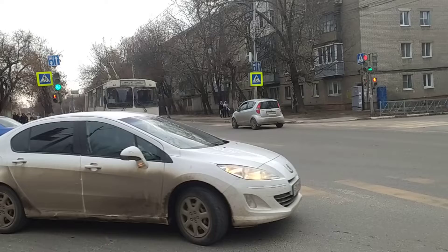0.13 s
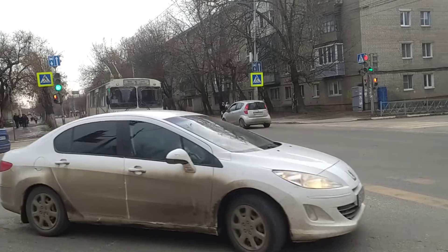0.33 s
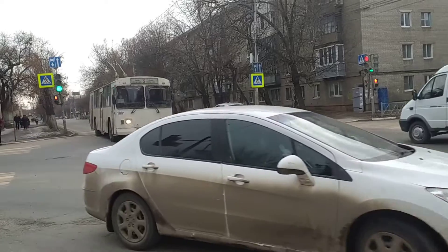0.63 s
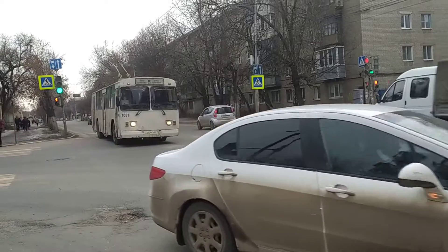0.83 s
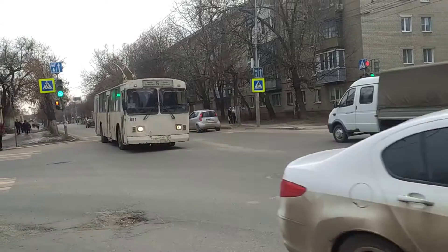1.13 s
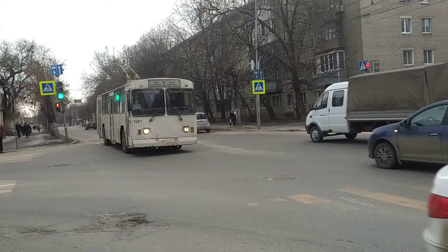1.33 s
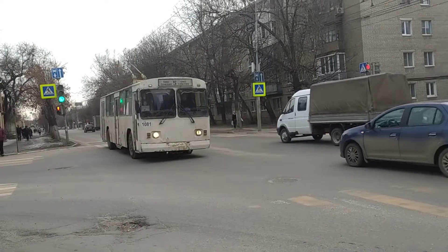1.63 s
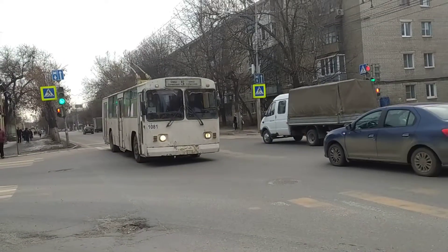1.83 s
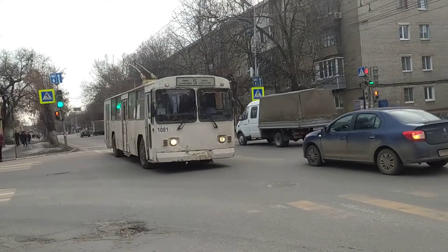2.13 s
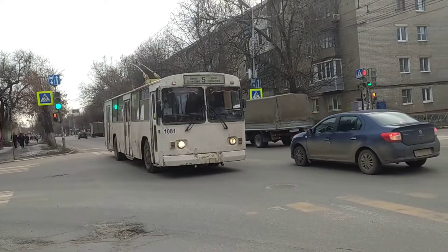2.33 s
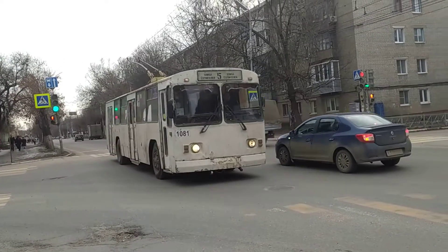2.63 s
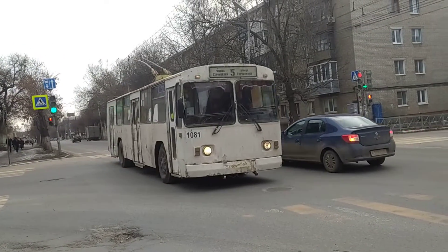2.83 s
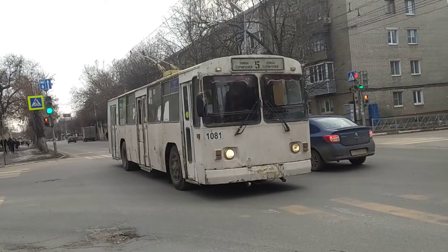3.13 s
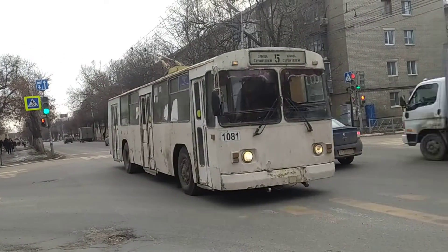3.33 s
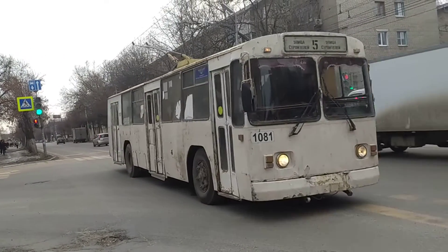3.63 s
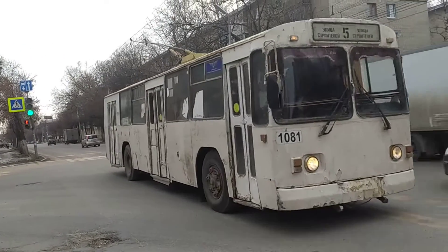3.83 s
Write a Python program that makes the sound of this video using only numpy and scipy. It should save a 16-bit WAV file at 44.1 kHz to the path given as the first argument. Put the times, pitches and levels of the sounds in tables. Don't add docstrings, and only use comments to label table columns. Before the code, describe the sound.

Traffic at a windy city crossing, on a handheld phone. Silence until about 0.4 s, then abruptly tyre roar with gritty clicks from a close car, and a diesel van's rattling knocks, strongest at 0.9-1.8 s. Both recede after 2 s. Tiny, very high brake squeals flutter around 2.1-2.4 s and intermittently from 3.1 s. Wind thumps each side separately, with hard left slaps near 2.2 and 2.8 s, over distant traffic rumble.

```python
import sys
import numpy as np
from scipy import signal
from scipy.fft import rfft, irfft, next_fast_len
from scipy.io import wavfile
from scipy.ndimage import uniform_filter1d, map_coordinates

SR = 44100
rng = np.random.default_rng(int(sys.argv[2]) if len(sys.argv) > 2 else 0)


def voltage_ratio(level):
    return 10 ** (np.asarray(level, float) / 20)


def log_audio(samples):
    frames = np.atleast_2d(samples).T
    limited = np.clip(frames, -1, 1)
    pcm = np.round(limited * 32767).astype(np.int16)
    wavfile.write(sys.argv[1], SR, pcm)


N = 176400

# time in seconds, firing rate in Hz, exhaust hum in dB.
ENGINE = [(.4, 43.8, -34), (.92, 42.9, -33), (1.22, 40, -28.5), (1.6, 43.7, -35.5), (1.85, 45.48, -28),
          (2.25, 48.25, -38.5), (2.6, 53.76, -27), (3.08, 58.2, -32), (3.5, 60.7, -42.5), (4, 61.7, -39)]
# time in seconds, level in dB.
VAN_NEARNESS = [(.4, -34.5), (.68, -30), (.85, -26), (.93, -21.5), (1.02, -26), (1.17, -23.5), (1.36, -35),
                (1.45, -26.5), (1.82, -26.5), (1.96, -30.5), (2.23, -28), (2.4, -33), (3.2, -35.5),
                (4, -45.5)]
# start in seconds, peak in dB, pitch in Hz.
KNOCKS = [(0.8637, 4, 1460), (0.8872, 8.5, 1340), (0.9086, -14, 2220), (0.9495, -12, 2000),
          (1.0453, -3, 1280), (1.0942, 5, 1340), (1.1837, 1, 1980), (1.4025, -9, 2000), (1.5411, -3, 2280),
          (1.631, -3, 2170), (1.7152, -4, 2170), (1.7876, 1.5, 2161), (1.831, -6, 2213)]
# centre in Hz, width in Hz, level in dB.
BLOCK_MODES = [(1204, 320, -1), (2202, 290, 1), (3400, 160, -7.5), (6040, 1500, -18.5)]
# time in seconds, level in dB.
CAR_NEARNESS = [(.4, -32), (.5, -32.5), (.6, -30.5), (.72, -29), (.92, -30), (1.05, -31.5), (1.12, -29.5),
                (1.18, -27.5), (1.27, -29), (1.4, -31), (1.47, -32.5), (1.7, -32.5), (1.85, -34),
                (2.0, -35.5), (2.4, -36.5), (3.3, -37), (3.7, -39), (4, -43)]
# frequency in Hz, density in dB per Hz.
TYRE_SPECTRUM = [(400, -25), (900, 5.5), (1500, -2.5), (3000, -7), (4800, -16), (9000, -8.5), (10500, -22),
                 (15000, -29.5)]
# frequency in Hz, correlation from 0 to 1.
TYRE_ALIKE = [(500, 0.63), (2500, 0.12), (4000, 0.011)]
# start in seconds, peak in dB, decay time in seconds.
GRIT = [(.4846, -28, .004), (0.811, -21, 0.0044), (1.097, -22, 0.0041), (1.116, -18.5, 0.0062),
        (1.286, -20, .004), (1.352, -21, 0.0044), (1.4031, -18.5, 0.0043), (1.422, -20, 0.0035),
        (1.574, -25, .004), (1.762, -23, 0.0044), (2.147, -24, 0.0049), (3.842, -26.5, 0.0048)]
# frequency in Hz, density in dB per Hz.
GRIT_SPECTRUM = [(4000, -30), (6000, -1.5), (8500, 3.5), (10000, -7.5), (14000, -27)]
# middle in seconds, length in seconds, level in dB, pitch in Hz,
# left port lead in radians.
SQUEALS = [(2.135, .03, -42, 13000, 1.3), (2.16, .022, -33, 13010, 1.3), (2.186, .022, -22.5, 12930, 1.3),
           (2.209, .026, -21.5, 12910, 1.3), (2.24, .02, -33, 12900, 1.1),
           (2.262, .024, -21.5, 12920, 1.05), (2.281, .026, -22, 12925, 1.05),
           (2.304, .024, -29, 12940, 1.05), (2.35, .07, -45, 12900, 1.05), (2.21, .08, -40, 12640, .3),
           (2.29, .08, -41, 12600, .3), (2.27, .08, -44, 13250, 2.2), (2.134, .035, -30, 5585, 1.7),
           (2.175, .05, -34, 5620, 1.7), (2.213, .025, -29.5, 5625, 1.7), (2.255, .035, -37, 5670, 1.7),
           (2.15, .11, -48, 11200, 1.9), (2.36, .03, -41, 10880, 1.9), (2.89, .068, -42.5, 10860, 1.9),
           (3.1, .06, -56, 10150, 1.9), (3.1, .02, -19, 12895, -.2), (3.117, .02, -24, 12910, -.2),
           (3.145, .035, -32, 12895, -.4), (3.184, .028, -27, 12905, -.5), (3.235, .07, -32, 12930, -.5),
           (3.13, .04, -48, 13340, 1.5), (3.245, .09, -46, 13350, 1.5), (3.41, .07, -36, 12915, -.3),
           (3.44, .06, -47, 13290, 1.5), (3.55, .042, -25, 12890, .1), (3.545, .06, -42, 13280, 1.5),
           (3.69, .05, -39, 12870, -1.6), (3.745, .06, -36, 12890, -1.6), (3.748, .045, -36, 13225, -1.2),
           (3.85, .04, -41, 12880, -1.6), (3.85, .07, -45, 13190, -1.2), (3.905, .04, -33, 12910, -1.8),
           (3.985, .08, -30, 12850, -1.8), (3.98, .07, -35, 13020, -1.8), (3.97, .06, -38, 13200, -1.2)]
BRAKE_MODES_HZ = [5620, 10150, 10870, 11200, 12620, 12910, 13030, 13260]
# middle in seconds, peak in dB, length in seconds, brightness in dB.
LEFT_GUSTS = [(0.41, -18.5, 0.031, -15), (0.471, -14.5, 0.047, -13), (0.549, -19, 0.11, -4),
              (0.699, -12.5, 0.024, -2), (0.864, -23, 0.038, -17), (1.16, -14, 0.042, -3),
              (1.24, -17, 0.081, 1), (1.364, -18, 0.054, -18), (1.673, -18.5, 0.052, -6),
              (1.803, -14, 0.045, -4), (2.067, -13.5, 0.033, -22), (2.167, -19.5, 0.029, -1.5),
              (2.235, -13.5, 0.1, -5), (2.508, -17, 0.06, -6.5), (2.659, -18, 0.025, -21),
              (2.765, -16, 0.03, -8), (2.894, -13, 0.041, -3.5), (3.032, -16.5, 0.09, -3),
              (3.113, -12, 0.02, -2.5), (3.219, -15.5, 0.11, -7.5), (3.349, -15.5, 0.032, -2.5),
              (3.395, -11, 0.032, -8.5), (3.94, -18, 0.32, -10.5)]
RIGHT_GUSTS = [(0.488, -16, 0.066, -11), (0.62, -17, 0.049, -19), (0.924, -18, 0.057, -14),
               (1.052, -19, 0.15, -18), (1.436, -12, 0.026, -5.5), (1.581, -21, 0.11, -8),
               (1.674, -23, 0.05, 3), (1.834, -19, 0.13, -11), (2.496, -8, 0.023, -11),
               (2.558, -8.5, 0.03, -10), (2.645, -14, 0.026, -19), (2.816, -13, 0.061, -8),
               (3.093, -16.5, 0.054, -16), (3.691, -12, 0.02, -22), (3.861, -14, 0.034, -12)]
# frequency in Hz, density in dB per Hz.
THUMP_SPECTRUM = [(8, -50), (28, 4.5), (70, -8.5), (180, 2.5), (300, -0.5), (450, -10.5), (900, -46),
                  (3000, -100)]
FLUTTER_SPECTRUM = [(200, -51), (400, -1.5), (600, -0.5), (900, -6.5), (1400, -9.5), (4000, -100)]
# middle in seconds, peak in dB, pitch in Hz, length in cycles,
# left over right in dB.
SLAPS = [
    (2.234, -4, 463, 1.6, 16),
    (2.248, -3.5, 705, 1.5, 16),
    (2.2534, -3, 181, 1.22, 14),
    (2.773, -4, 513, 0.99, 12),
    (2.891, -10, 420, 0.92, 5),
    (2.904, -13, 752, 1.6, 8),
    (2.924, -12, 230, 1.4, 3),
    (3.098, -12.5, 188, 3.4, 2),
    (3.416, -5.5, 153, 2.8, 21),
    (3.627, -14, 479.5, 1.1, 9),
]
# frequency in Hz, density in dB per Hz.
TOWN_SPECTRUM = [(12, -32), (45, -2.5), (200, 1), (600, -7), (1500, -17.5), (4800, -27), (8500, -25.5),
                 (15000, -78)]
# frequency in Hz, correlation from 0 to 1.
TOWN_ALIKE = [(40, 0.56), (300, 1), (1500, 0.21), (3000, 0.017)]

SIDE_LEAD_S, KNOCK_LEAD_S = 0.0004364, 0.00031


def unit(x):
    return x / np.sqrt(np.mean(x ** 2) + 1e-20)


def along(points, hz):
    f, v = np.transpose(points)
    return np.interp(np.log(hz + 1), np.log(f + 1), v)


def curves(rows):
    s, *columns = np.transpose(rows)
    return [np.interp(np.arange(N) / SR, s, c) for c in columns]


def wobble(rate_hz):
    knots = rng.standard_normal(int(N * rate_hz / SR) + 4)
    return map_coordinates(knots, [np.arange(N) * rate_hz / SR])


def filtered(x, response):
    m = next_fast_len(N + SR // 2)
    return irfft(rfft(x, m) * response(np.fft.rfftfreq(m, 1 / SR)), m)[..., :N]


def from_side(pair, lead_s=SIDE_LEAD_S):
    return filtered(pair, lambda hz: np.exp(-2j * np.pi * hz * np.array([[0], [lead_s]])))


def rush(spectrum, alike, patchy_db):
    z = signal.stft(rng.standard_normal((2, N)), nperseg=512)[2]
    field = uniform_filter1d(rng.standard_normal(z.shape[1:]), size=6, axis=0)
    field = uniform_filter1d(field, size=14, axis=1)
    pair = signal.istft(z * voltage_ratio(patchy_db * unit(field)), nperseg=512)[1][:, :N]

    def spread(hz):
        turn = np.arccos(np.clip(along(alike, hz), -1, 1)) / 2
        return voltage_ratio(along(spectrum, hz)) * [np.cos(turn), np.sin(turn)]

    mid, side = filtered(pair, spread)
    return unit(np.array([mid + side, mid - side]))


def steady(x):
    power = uniform_filter1d(x ** 2, size=round(.03 * SR), axis=1)
    return x / np.sqrt(np.abs(power) + 0.062)


def block_response(hz):
    total = 0
    for k, (centre, width, db) in enumerate(BLOCK_MODES):
        ring = 1j * hz * width
        total = total + (-1) ** k * voltage_ratio(db) * ring / (centre ** 2 - hz ** 2 + ring)
    return total


def diesel_knocks():
    t60_s, level_db, onset_s = 0.011, 1, 0.00085
    out, t = np.zeros(N + SR), np.arange(SR // 20) / SR
    for s, db, hz in KNOCKS:
        decay = voltage_ratio(db + level_db - 60 * t / t60_s)
        out[round(s * SR):][:len(t)] += decay * np.sin(2 * np.pi * hz * t) * (1 - np.exp(-t / onset_s))
    return out[:N]


def van():
    jitter_s, scatter_db, burst_s = .0015, 2.5, 0.0048
    clatter_db, steady_db, alike, pan_db = -1.5, -1, 0.53, -2.5
    rate_hz, hum_db = curves(ENGINE)
    near_db, = curves(VAN_NEARNESS)
    turns = np.cumsum(rate_hz) / SR
    draw = rng.standard_normal((400, 2))
    at = np.flatnonzero(np.diff(np.floor(turns)))
    late = (jitter_s * SR * draw[:len(at), 0]).astype(int)
    fire = np.zeros(N)
    fire[np.clip(at + late, 0, N - 1)] = voltage_ratio(scatter_db * draw[:len(at), 1])
    gate = unit(np.convolve(fire, np.exp(-np.arange(SR // 20) / SR / burst_s))[:N])

    same, other = rng.standard_normal((2, N))
    turn = np.arccos(alike) / 2
    hiss = np.cos(turn) * same + np.sin(turn) * other * [[1], [-1]]
    bursts = voltage_ratio(clatter_db) * unit(filtered(gate * hiss, block_response))
    ungated = unit(filtered(np.roll(hiss, N // 3, axis=1), block_response))
    clatter = bursts + voltage_ratio(steady_db + 1.5 * wobble(14.0)) * ungated

    hum = np.sin(2 * np.pi * turns) + 0.15 * np.sin(4 * np.pi * turns)
    hum = np.sqrt(2) * voltage_ratio(hum_db + 1.3 * wobble(5.8)) * hum
    pan = voltage_ratio([[pan_db / 2], [-pan_db / 2]])
    return from_side(voltage_ratio(near_db) * clatter * pan + hum) + from_side(diesel_knocks() * pan, KNOCK_LEAD_S)


def tyres():
    near_db, = curves(CAR_NEARNESS)
    level_db = near_db + 7.5 + 1.2 * wobble(9.54) + 0.61 * wobble(29.72)
    return from_side(voltage_ratio(level_db) * rush(TYRE_SPECTRUM, TYRE_ALIKE, patchy_db=2.0))


def grit():
    t, bursts = np.arange(N) / SR, np.zeros(N)
    for s, db, decay_s in GRIT:
        bursts += voltage_ratio(db) * (t >= s) * np.exp(-np.clip(t - s, 0, 1) / decay_s)
    return bursts * rush(GRIT_SPECTRUM, [(6000, 0.11)], patchy_db=4.0)


def brakes():
    squeal_flutter_db, port_flutter_db, waver_hz = 1.5, 2, 14
    halo_db, halo_hz = -12, 250
    out, t, rows = np.zeros((2, N)), np.arange(N) / SR, np.array(sorted(SQUEALS))
    mode = np.abs(rows[:, 3:4] - BRAKE_MODES_HZ).argmin(axis=1)
    waver = waver_hz * wobble(39.6)
    flutter_db = squeal_flutter_db * wobble(45.6)
    flutter_db = flutter_db + port_flutter_db * np.array([wobble(30.24), wobble(27)])
    halo = 1 + voltage_ratio(halo_db) * np.array([wobble(2 * halo_hz), wobble(2 * halo_hz)])
    for k in np.unique(mode):
        middle_s, length_s, db, hz, ahead_rad = rows[mode == k].T
        power = np.zeros(N)
        for m, n, d in zip(middle_s, length_s, db):
            power += voltage_ratio(2 * d) * np.exp(-2 * (1.6 * (t - m) / n) ** 2)
        shift = k * N // 9
        phase = 2 * np.pi * np.cumsum(np.interp(t, middle_s, hz) + np.roll(waver, shift)) / SR
        grain = np.roll(voltage_ratio(flutter_db) * halo, shift, axis=1)
        lag = np.interp(t, middle_s, ahead_rad) * [[0], [1]]
        out += np.sqrt(2 * power) * grain * np.sin(phase - lag)
    return out


def wind():
    gust_db, breeze_db, breeze_bright_db, lumps_db = -3, -26, -7.5, 2.5
    t = np.arange(N) / SR
    lumps = unit(voltage_ratio(lumps_db * np.array([wobble(14), wobble(14)])))
    low = voltage_ratio(breeze_db) * lumps
    high = voltage_ratio(breeze_db + breeze_bright_db) * unit(lumps ** 1.3)
    for port, gusts in enumerate((LEFT_GUSTS, RIGHT_GUSTS)):
        for s, db, length_s, bright_db in gusts:
            swell = voltage_ratio(db + gust_db) * np.exp(-(2.08 * (t - s) / length_s) ** 2)
            low[port] = np.hypot(low[port], swell)
            high[port] = np.hypot(high[port], swell * voltage_ratio(bright_db))
    thump = steady(rush(THUMP_SPECTRUM, [(100, 0.035)], patchy_db=3.0))
    flutter = steady(rush(FLUTTER_SPECTRUM, [(100, 0.018)], patchy_db=1.5))
    return low * thump + high * flutter


def slaps():
    t, out = np.arange(N) / SR, np.zeros((2, N))
    for s, db, hz, cycles, pan_db in SLAPS:
        swell = np.exp(-(2 * (t - s) * hz / cycles) ** 2)
        out += voltage_ratio([[db], [db - pan_db]]) * swell * np.cos(2 * np.pi * hz * (t - s))
    return out


def town():
    level_db, fade_db_per_s = -26, -0.38
    level_db = level_db + fade_db_per_s * (np.arange(N) / SR - 2) + 2.0 * wobble(1.355)
    return from_side(voltage_ratio(level_db) * rush(TOWN_SPECTRUM, TOWN_ALIKE, patchy_db=-2.0))


def scene():
    return van() + tyres() + grit() + brakes() + wind() + slaps() + town()


def top_cut(x):
    return signal.sosfilt(signal.butter(12, 15300, fs=SR, output="sos"), x)


def record(dry):
    ceiling, start_s = .9, .379
    held = dry / (1 + np.abs(dry / ceiling) ** 6) ** (1 / 6)
    heard = held * (np.arange(N) >= start_s * SR)
    return top_cut(heard)


dry = scene()
out = record(dry)
log_audio(out)
```